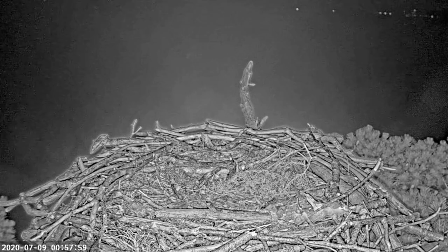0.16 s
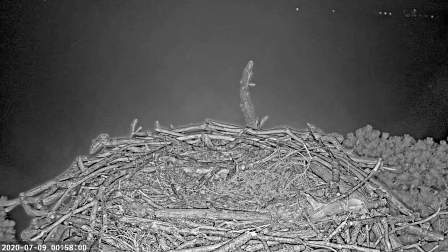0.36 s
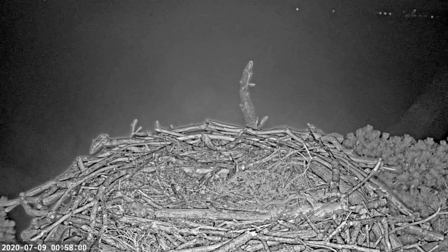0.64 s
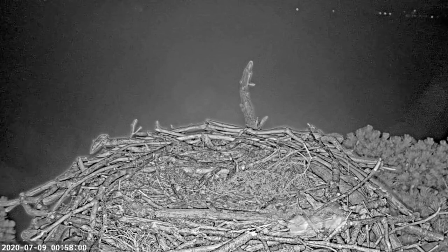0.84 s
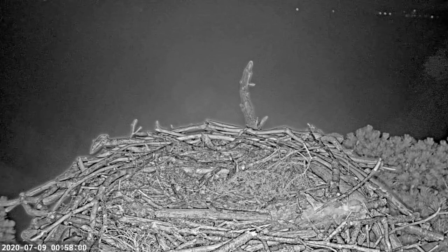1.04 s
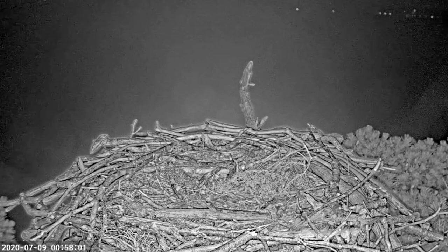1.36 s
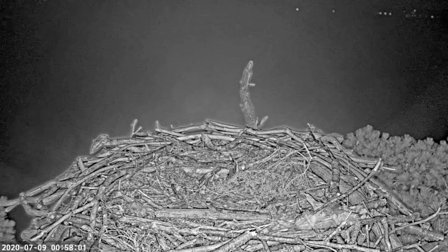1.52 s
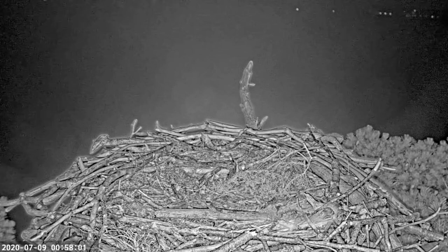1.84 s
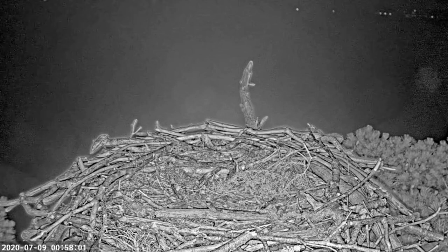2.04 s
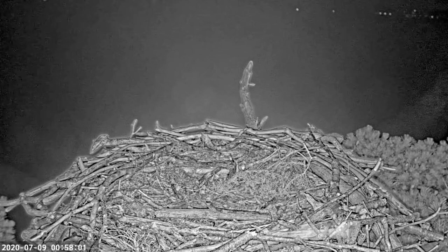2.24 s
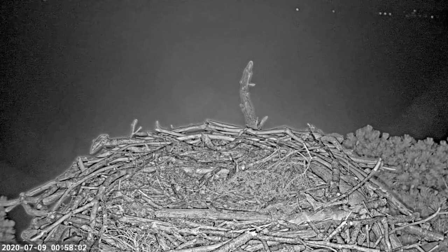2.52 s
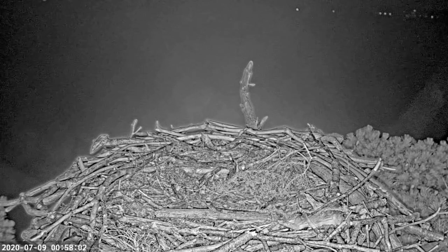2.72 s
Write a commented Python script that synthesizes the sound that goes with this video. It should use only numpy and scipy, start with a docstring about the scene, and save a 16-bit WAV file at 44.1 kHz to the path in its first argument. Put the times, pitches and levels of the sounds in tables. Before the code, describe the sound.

A nightjar gives four quick clipped notes in the first 0.1 seconds, then rests. From about 0.4 seconds it churrs, roughly 27 short falling whistles a second, starting soft and flatter, swelling until about 0.8, then holding steadily to the end near 2.85. Nearby surfaces echo the notes slightly. Low wind gusts rumble and flutter on the microphone, mostly before 1.5 seconds, easing later, over faint steady hiss.

```python
"""At night a nightjar ends one phrase with four clipped notes, while wind rumbles on the microphone over a faint hiss.
After a short rest it starts a churr of about 27 notes a second, which swells and then holds.
Each note is a steeply falling whistle with a sharp accent midway, made from a sine, its octave and airy noise.
Nearby surfaces echo every note. The wind is two bands of noise whose levels rise and fall in gusts; the hiss is
steady noise."""
import sys
import numpy as np
from scipy import signal
from scipy.fft import rfft, irfft
from scipy.io import wavfile

SR = 44100
rng = np.random.default_rng(int(sys.argv[2]) if len(sys.argv) > 2 else 0)


def file_out(sig):
    """Save sig as 16-bit WAV at sys.argv[1]."""
    # one column per channel
    cols = np.atleast_2d(sig).T
    # limit, then scale
    lim = np.clip(cols, -1, 1)
    pcm = np.round(lim * 32767).astype(np.int16)
    wavfile.write(sys.argv[1], SR, pcm)


N = 127008
TIME = np.arange(N) / SR


def from_db(db):
    """Turn decibels into a factor to multiply the sound by."""
    return 10 ** (np.asarray(db) / 20)


def rms_one(x):
    """Scale to an average strength (rms) of 1."""
    return x / np.sqrt(np.mean(x ** 2) + 1e-20)


def read_curve(rows, t):
    """Read each column of a table at the times t, with straight lines between the rows."""
    time_s, *columns = np.transpose(rows)
    return [np.interp(t, time_s, column) for column in columns]


def noise(spectrum):
    """Steady noise, its frequencies weighted to give the wanted colour; rms 1."""
    freq_hz, level_db = np.transpose(spectrum)
    bins_hz = np.maximum(np.fft.rfftfreq(N, 1 / SR), 1)
    weight = from_db(np.interp(np.log(bins_hz), np.log(freq_hz), level_db))
    return rms_one(irfft(rfft(rng.standard_normal(N)) * weight, N))


def drift(corner_hz):
    """Slow random wandering: noise that weakens above the corner frequency; rms 1."""
    bins_hz = np.fft.rfftfreq(N, 1 / SR)
    return rms_one(irfft(rfft(rng.standard_normal(N)) / (1 + (bins_hz / corner_hz) ** 2), N))


def hiss():
    """A faint, steady hiss: random noise, weaker towards the treble."""
    # colour of the hiss: freq_hz [Hz], level_db [dB per Hz, relative]
    hiss_colour = [(100, 0.5), (500, 7.5), (900, 5), (2000, 3), (4000, 0), (7000, -2), (10500, -3),
                   (12500, -8), (14000, -14)]
    return from_db(-69) * noise(hiss_colour)


def wind():
    """Gusts buffet the microphone: a deep rumble, and an upper rumble that flutters at random."""
    # gusts of the deep rumble: time_s [s], level_db [dB, before its trim]
    deep_gusts = [(0.0, -36), (0.46, -31), (0.57, -35), (0.64, -30), (0.72, -32), (0.79, -31.5),
                  (1.15, -35.5), (1.44, -36.5), (1.48, -58), (1.55, -29), (1.61, -35.5), (1.71, -35),
                  (1.77, -42.5), (2.33, -42), (2.66, -35.5), (2.68, -46), (2.84, -37), (2.86, -38.5)]
    # gusts of the upper rumble: time_s [s], level_db [dB, before its trim]
    upper_gusts = [(0, -36.5), (.15, -40.5), (.27, -33.5), (.38, -44.5), (.44, -35.5), (.59, -40.5),
                   (.625, -31.5), (.7, -41), (.76, -39), (.83, -38), (.96, -35.5), (1.16, -46.5),
                   (1.25, -39.5), (1.4, -40.5), (1.46, -58.5), (1.53, -53.5), (1.57, -38.5), (1.61, -55.5),
                   (1.67, -44), (1.74, -58), (1.97, -57), (2.02, -63.5), (2.14, -57), (2.3, -59),
                   (2.46, -45), (2.51, -56), (2.58, -44), (2.7, -52), (2.78, -55), (2.85, -54)]
    # colour of the deep rumble: freq_hz [Hz], level_db [dB per Hz, relative]
    deep_colour = [(12, 6), (22, 0), (47, 0), (80, -8.5), (120, -16), (200, -31), (400, -76)]
    # colour of the upper rumble: freq_hz [Hz], level_db [dB per Hz, relative]
    upper_colour = [(35, -19), (65, 2), (120, 0), (200, -0.5), (290, -3.5), (350, -15.5), (420, -28.5),
                    (550, -44.5), (800, -82.5)]
    deep_trim_db, upper_trim_db = 3.5, 2.5
    flutter_db, flutter_hz = 3, 23.4

    deep_db, = read_curve(deep_gusts, TIME)
    deep = from_db(deep_db + deep_trim_db) * noise(deep_colour)
    upper_db, = read_curve(upper_gusts, TIME)
    fluttering = rms_one(noise(upper_colour) * from_db(flutter_db * drift(flutter_hz)))
    upper = from_db(upper_db + upper_trim_db) * fluttering
    return deep + upper


def surroundings(bird):
    """The path to the microphone: near reflections, a short and a long diffuse tail, and two narrow dips."""
    # near reflections: delay_s [s], strength [factor; negative turns the wave upside down]
    echoes = [(.00145, -.22), (.00208, -.21), (.00411, .05), (.00504, -.1), (.00602, -.11), (.00742, .15),
              (.00857, .13), (.01042, .09), (.01328, -.04), (.01498, -.07), (.0171, .04), (.0201, .03),
              (.0253, .03)]
    # diffuse scatter, near and far: level_db [dB], t60_s [s to fade by 60 dB], start_s [s]
    tails = [(-20, 0.19, 0.0098), (-29, 1.3, 0.023)]
    # narrow dips in the path: freq_hz [Hz], width_hz [Hz]
    dips = [(1950, 38), (2660, 27)]
    scatter_low_hz = 1540  # the low end of the notes scatters little

    heard = bird.copy()
    for delay_s, strength in echoes:
        heard += strength * np.interp(TIME - delay_s, TIME, bird, left=0)
    high_pass = signal.butter(3, scatter_low_hz, "high", fs=SR, output="sos")
    scattered = signal.sosfilt(high_pass, bird)
    for level_db, t60_s, start_s in tails:
        tail = rng.standard_normal(N) * from_db(-60 * TIME / t60_s) * (TIME > start_s)
        tail = tail / np.linalg.norm(tail)
        heard += from_db(level_db) * signal.fftconvolve(scattered, tail)[:N]
    for freq_hz, width_hz in dips:
        heard = signal.lfilter(*signal.iirnotch(freq_hz, freq_hz / width_hz, fs=SR), heard)
    return heard


def add_note(whistle, octave, airflow, accent_s, effort_db, reach, ending_db=0):
    """Add one falling whistle: a gliding sine, its octave, and the strength of the air that carries its rasp."""
    # one note at full effort: time_s [s from its accent], pitch_hz [Hz], level_db [dB below the accent]
    note = [(-.0076, 2540, -40), (-.0067, 2310, -14.6), (-.005, 2400, -11.6), (-.0022, 1820, -12.9),
            (-.0009, 1570, -4.1), (0, 1590, 0), (.0009, 1340, -5.8), (.0022, 1230, -13.7),
            (.004, 1130, -23.5), (.0065, 1050, -40)]
    bird_db, accent_hz, octave_db = -30.5, 1600, -24
    shape_scatter_db = 1.23  # the parts of a note vary in strength
    scatter_db, pitch_scatter = 0.36, 0.0037  # from note to note; pitch as a share
    flat_start_db = -11.5  # a note that starts lower also starts fainter: dB if all pitch height were lost
    ending_s = 0.0021  # the low ending takes over this long after the accent
    linger_per_db = 0.11  # a weak ending also falls later: share of its length added per dB lost

    time_s, pitch_hz, level_db = np.transpose(note)
    # reach is the share kept of the height above the accent pitch
    height = np.where(pitch_hz > accent_hz, reach, 1)
    pitch_hz = accent_hz + height * (pitch_hz - accent_hz)
    pitch_hz = pitch_hz * (1 + pitch_scatter * rng.standard_normal())

    level_db = level_db + ending_db * np.clip(time_s / ending_s, 0, 1) ** 2
    level_db = level_db + flat_start_db * (1 - reach) * np.clip(time_s / time_s[0], 0, 1)
    # the strongest point stays put
    varies = level_db < level_db.max()
    level_db = level_db + shape_scatter_db * rng.standard_normal(len(time_s)) * varies

    span = np.flatnonzero((TIME > accent_s + time_s[0]) & (TIME < accent_s + time_s[-1]))
    t = TIME[span] - accent_s
    linger = max(1 - linger_per_db * ending_db, .5)
    pitch_time_s = np.where(time_s > 0, time_s * linger, time_s)
    cycles = np.cumsum(np.interp(t, pitch_time_s, pitch_hz)) / SR
    phase = 2 * np.pi * (cycles + rng.random())
    swell = np.interp(t, time_s, from_db(level_db))
    gain = from_db(bird_db + effort_db + scatter_db * rng.standard_normal())

    whistle[span] += gain * swell * np.sin(phase)
    octave[span] += gain * reach * from_db(octave_db) * swell ** 2 * np.sin(2 * phase)
    airflow[span] += gain * reach * np.sqrt(swell)


def nightjar():
    """Four closing notes, a rest, then the long churr, growing in level and pitch height."""
    # notes that close the first phrase: accent_s [s], level_db [dB, relative to the bird's basic level]
    closing_notes = [(.0004, 4.5), (0.0219, -1), (.0476, -0.2), (0.0759, 0.7)]
    # pace of the churr: time_s [s], pace [notes per s]
    churr_pace = [(0.41, 27.92), (0.52, 27.61), (0.6, 27.02), (0.78, 26.82), (0.98, 27.23), (1.13, 26.66),
                  (1.24, 27.26), (1.32, 28.02), (1.48, 27.2), (1.57, 26.89), (1.75, 27.45), (2.0, 27.16),
                  (2.17, 26.57), (2.3, 27.36), (2.39, 26.26), (2.58, 26.64), (2.68, 27.4), (2.85, 26.44)]
    # effort of the churr: time_s [s], level_db [dB, relative to the bird's basic level],
    # reach [share of the full pitch height], ending_db [dB, change in the notes' low ending]
    churr_effort = [(.41, -7, 0.34, -12), (.48, -4, 0.71, -11), (0.548, -3, 0.86, -11),
                    (0.782, -0.5, 0.98, 0), (1.3, 0, 0.98, 0.5), (2.85, 1.05, 1.0, 0.5)]
    # colour of the airy rasp: freq_hz [Hz], level_db [dB per Hz, relative]
    rasp_colour = [(1500, -52), (2700, -1), (2900, 8), (3300, -9), (4500, -6), (8000, -20)]
    closing_reach = 0.485  # share of the full pitch height
    churr_start_s = .4079
    voice_low_hz, voice_high_hz = 840, 3040
    ring_hz, ring_width_hz = 3084, 53  # the octave of the accent rings in a narrow resonance
    rasp_db = -38  # a little airy noise rides on each note

    whistle, octave, airflow = np.zeros((3, N))
    for accent_s, effort_db in closing_notes:
        add_note(whistle, octave, airflow, accent_s, effort_db, closing_reach)

    # a note falls wherever the running count of notes passes a whole number
    clock_s = churr_start_s + TIME
    pace, = read_curve(churr_pace, clock_s)
    note_count = np.cumsum(pace) / SR
    accents_s = np.interp(np.arange(int(note_count[-1])), note_count, clock_s)
    efforts = read_curve(churr_effort, accents_s)
    for accent_s, effort_db, reach, ending_db in zip(accents_s, *efforts):
        add_note(whistle, octave, airflow, accent_s, effort_db, reach, ending_db)

    # the tiny 1e-18 keeps the filters from slowing down on vanishing numbers
    throat = signal.butter(3, [voice_low_hz, voice_high_hz], "band", fs=SR, output="sos")
    voice = signal.sosfilt(throat, whistle + 1e-18)
    resonance = signal.iirpeak(ring_hz, ring_hz / ring_width_hz, fs=SR)
    ringing = signal.lfilter(*resonance, octave + 1e-18)
    rasp = from_db(rasp_db) * airflow * noise(rasp_colour)
    return voice + ringing + rasp


def scene():
    """Bird, wind and hiss add up at one microphone."""
    return (surroundings(nightjar()) + wind() + hiss())[None]


def record(dry):
    """Fade in over 3 ms, then cut the highest treble steeply with a low-pass filter."""
    cutoff_hz = 14800  # from here up, everything is at least 70 dB weaker
    faded = dry * np.clip(TIME / .003, 0, 1)
    return signal.sosfilt(signal.cheby2(12, 70, cutoff_hz, fs=SR, output="sos"), faded)


dry = scene()
out = record(dry)
file_out(out)
```